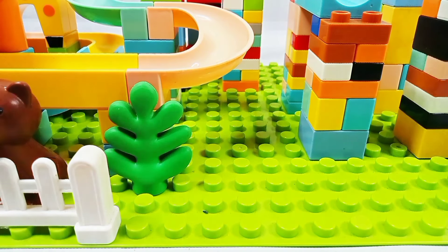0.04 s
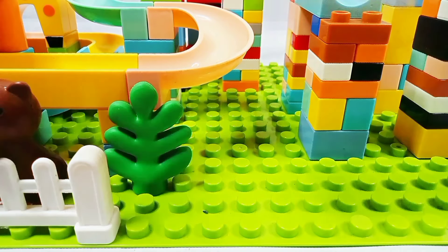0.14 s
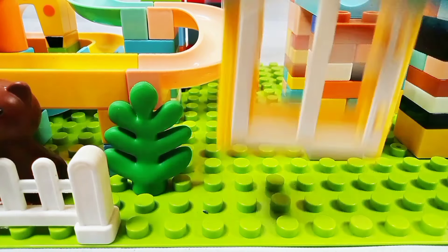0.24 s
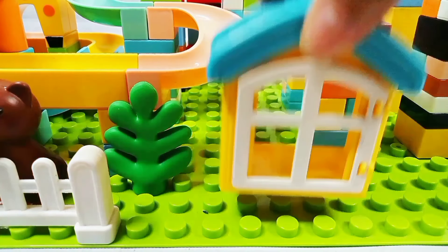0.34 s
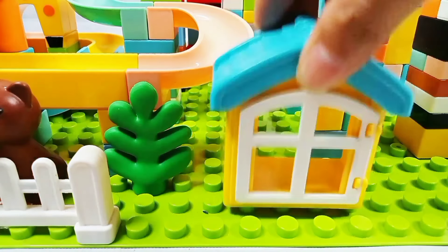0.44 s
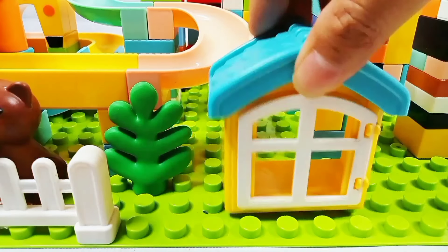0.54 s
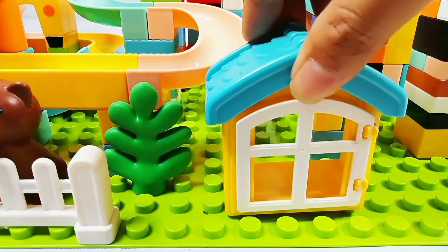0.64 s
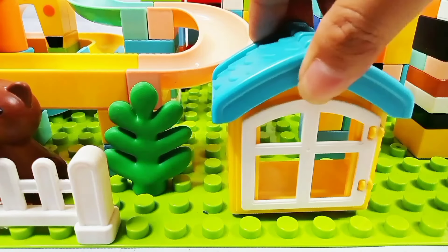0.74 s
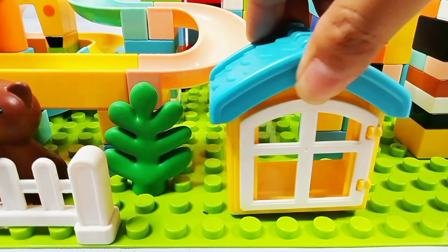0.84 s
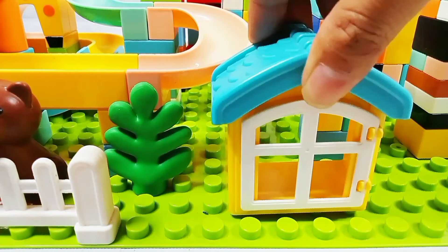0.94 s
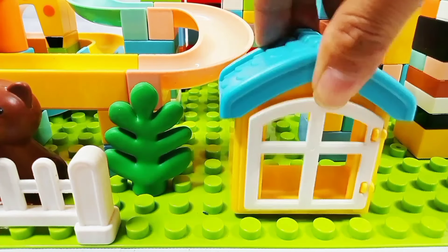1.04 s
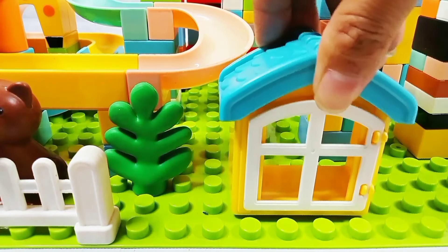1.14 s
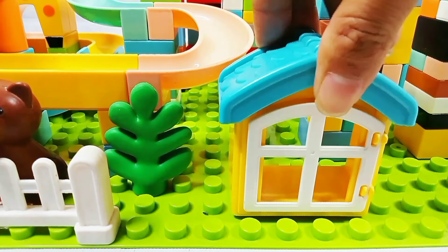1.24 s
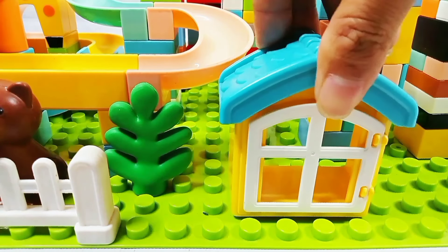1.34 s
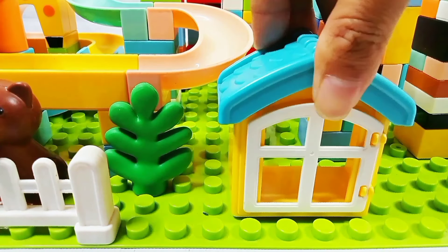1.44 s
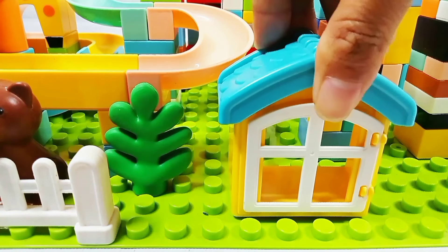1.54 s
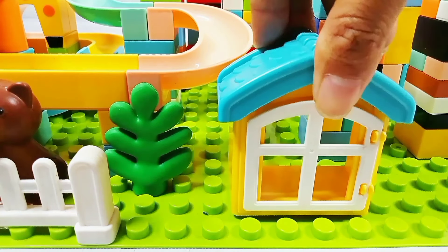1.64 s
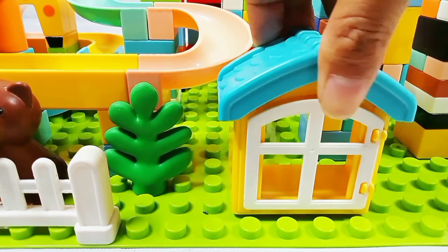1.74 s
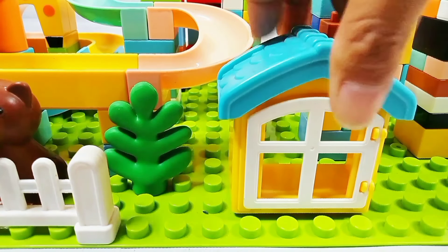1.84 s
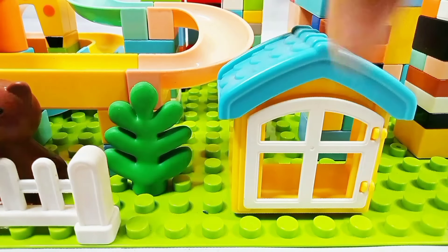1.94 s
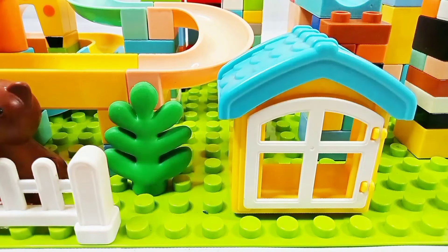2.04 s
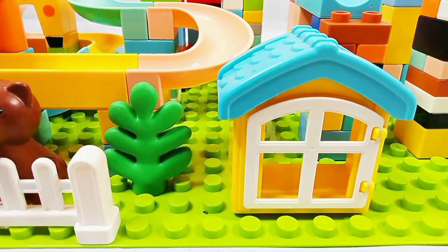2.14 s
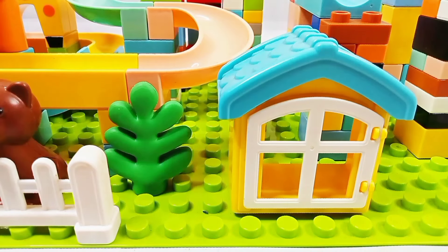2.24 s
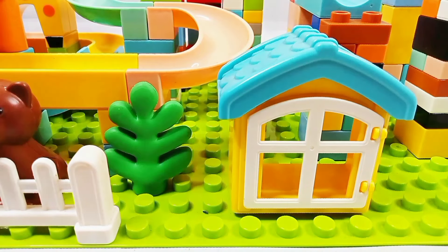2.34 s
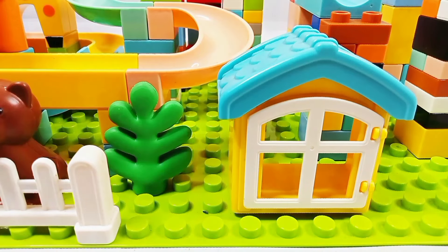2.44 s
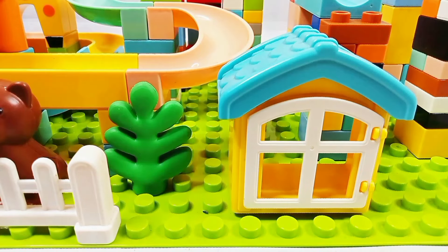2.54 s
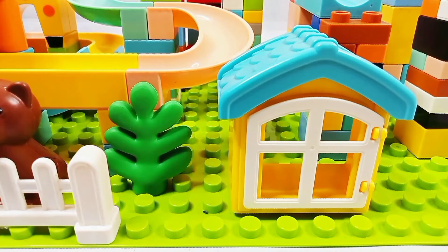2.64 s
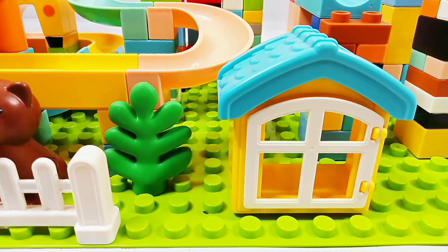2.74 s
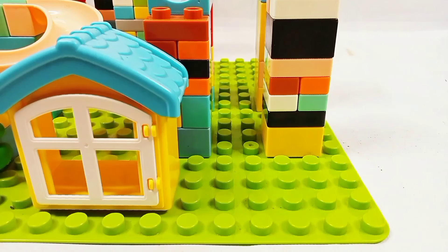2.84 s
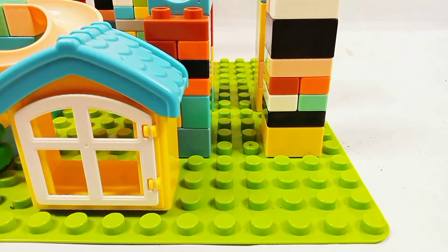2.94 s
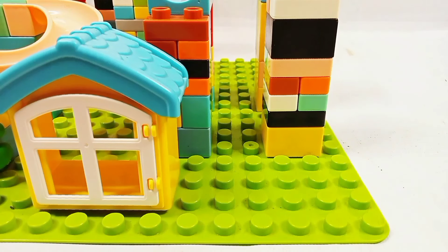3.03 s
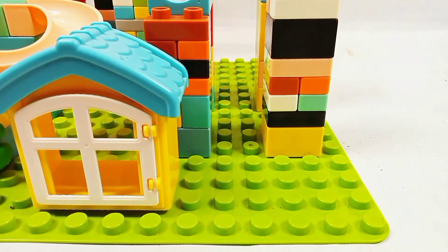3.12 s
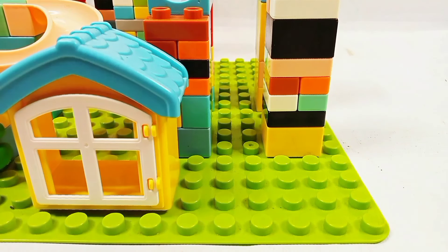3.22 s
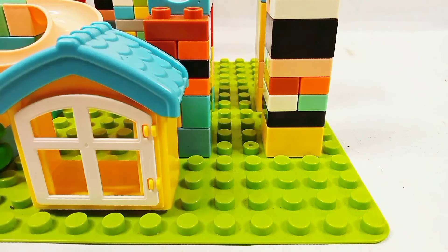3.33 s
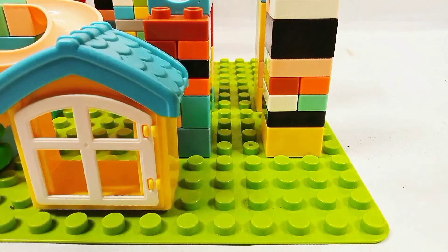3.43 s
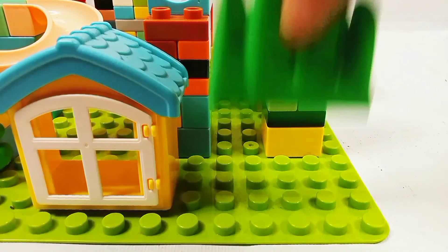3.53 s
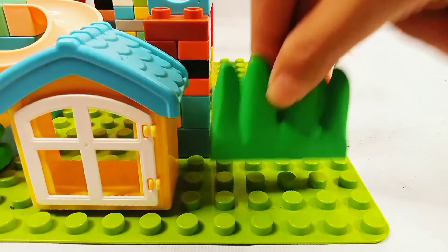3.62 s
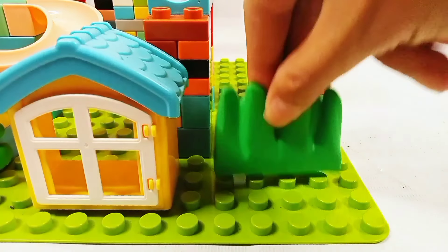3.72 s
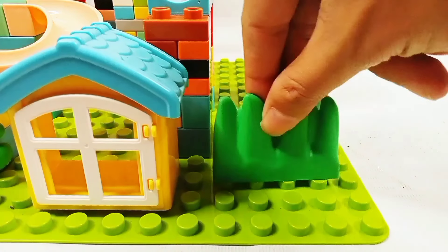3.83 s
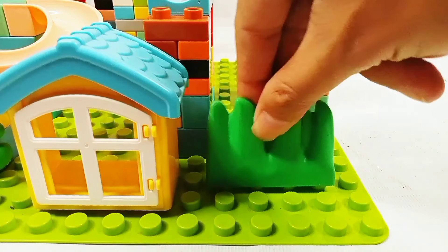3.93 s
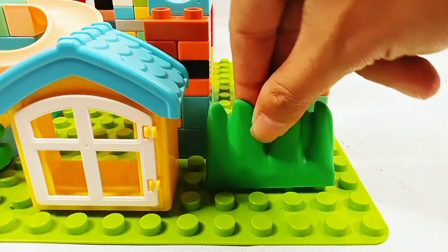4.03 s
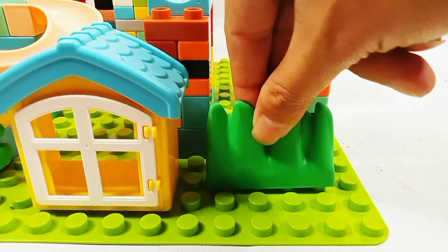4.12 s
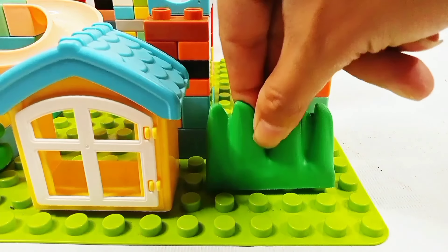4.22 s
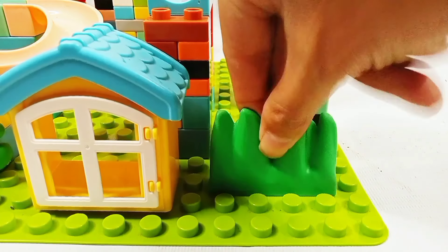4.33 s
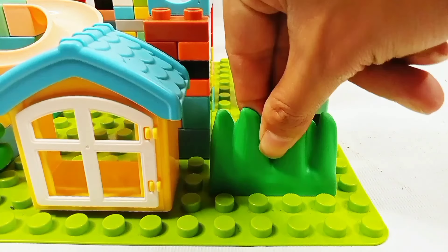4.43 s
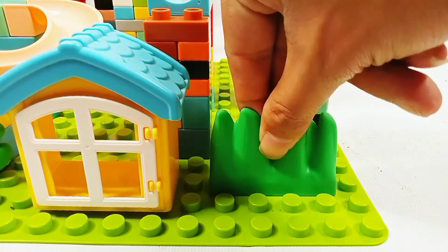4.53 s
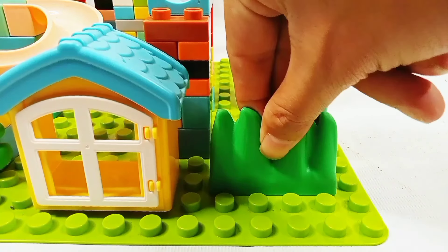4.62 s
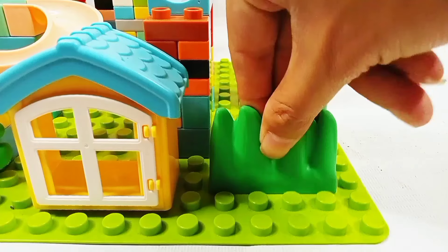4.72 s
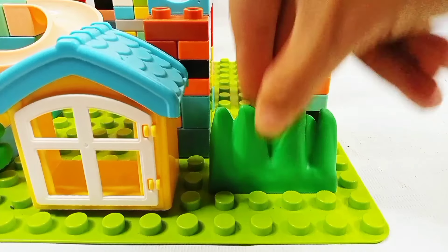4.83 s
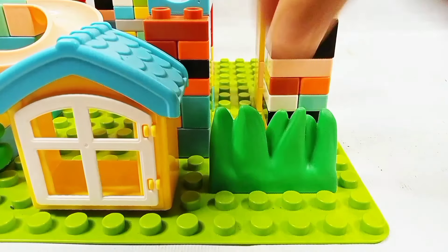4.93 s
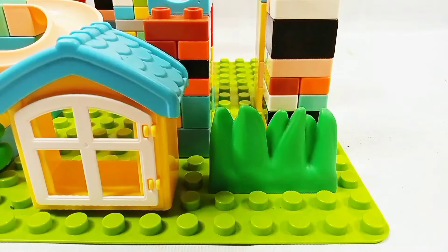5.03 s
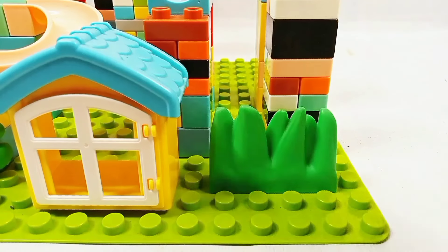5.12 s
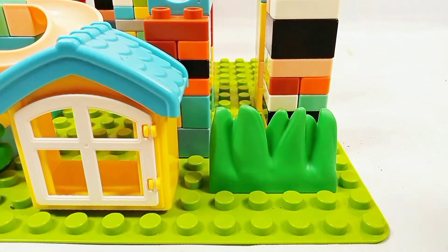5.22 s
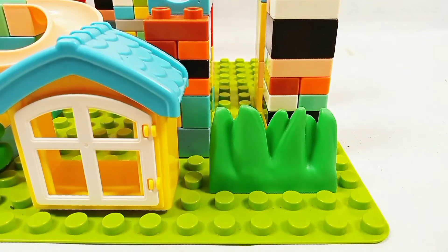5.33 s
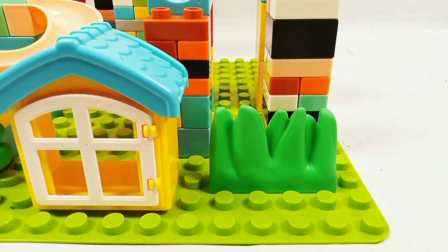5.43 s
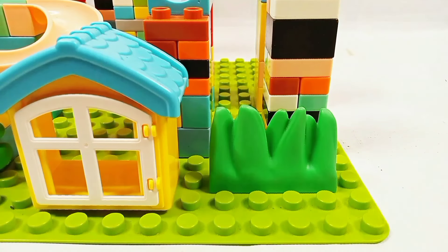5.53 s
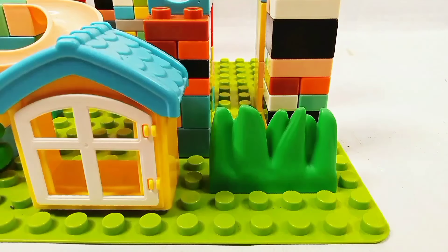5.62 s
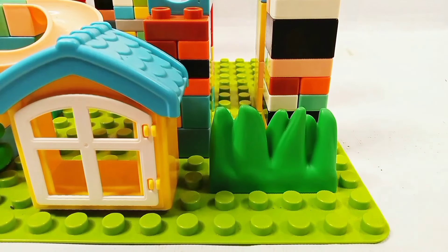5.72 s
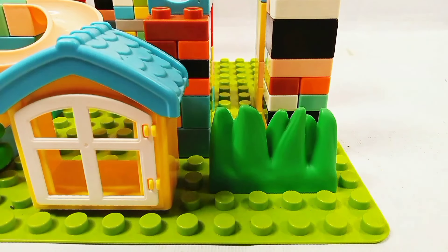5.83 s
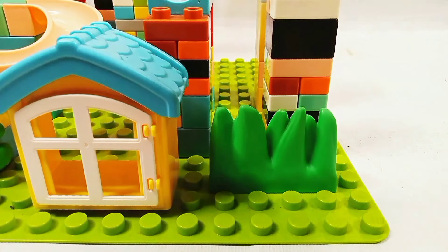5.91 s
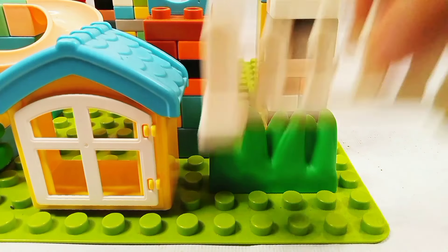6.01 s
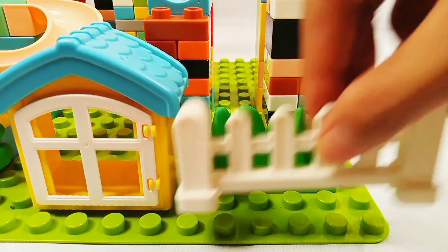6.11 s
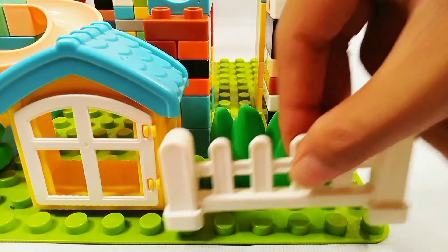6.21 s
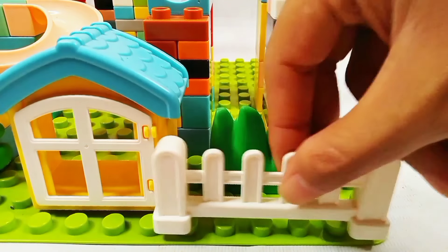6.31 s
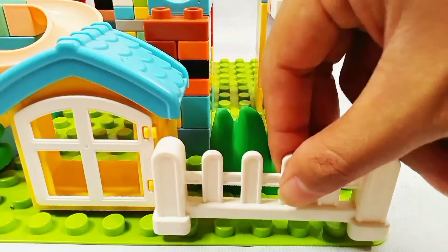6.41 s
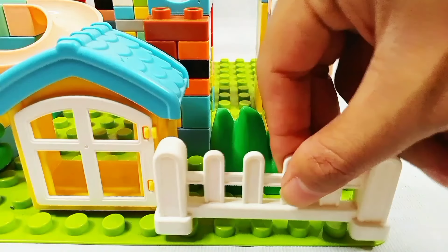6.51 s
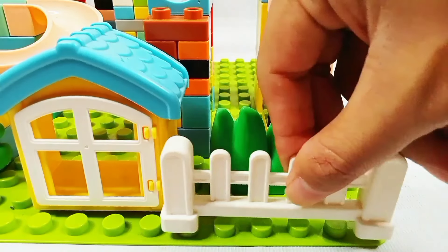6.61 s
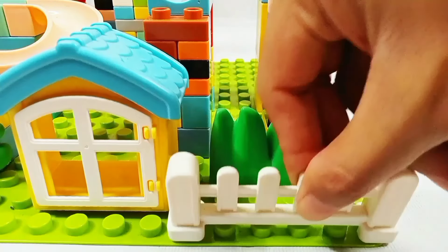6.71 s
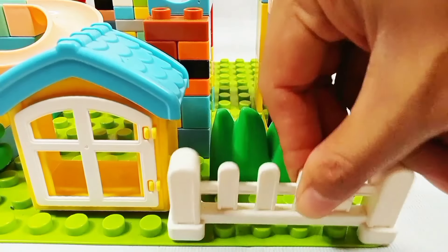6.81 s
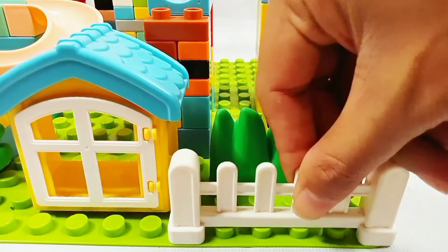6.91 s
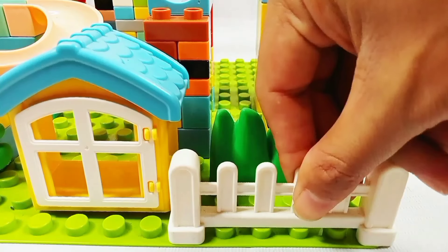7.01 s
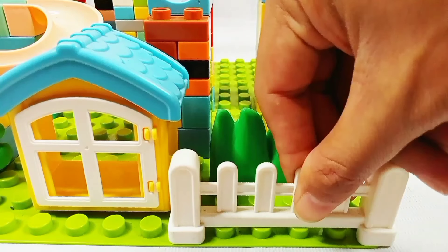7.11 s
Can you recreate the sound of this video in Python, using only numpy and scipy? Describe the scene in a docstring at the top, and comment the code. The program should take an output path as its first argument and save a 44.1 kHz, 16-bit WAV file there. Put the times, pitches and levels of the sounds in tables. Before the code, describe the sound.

A close microphone in a small, quiet room picks up hollow hard plastic pieces being pressed onto a studded baseplate. Near silence at first, with only a very faint buzz and noise floor. At about 0.6 s light knocks begin, with a sharp burst of cracks at 0.87 s, more taps around 1.0 s, and a bright, scraping double snap at 1.2 s. Small faint ticks trail off until about 2 s. Quiet until 3.9 s, when a tighter, drier piece snaps at 3.93 and 4.04 s, with small taps, soft low finger rumble and a heavy snap with a thump at 4.45 s. Rumble eases by 5 s. Quiet again until 6.4 s: a brief squeak and crack at 6.46 s, faint scraping, then a loud, deep seating clack at 6.84 s and light taps near 7 s. The hardest snaps distort slightly.

```python
"""Hollow plastic knocks and scrapes over studs, then snaps home in quick clusters of cracks, three times over:
a toy house, a tuft of grass and a fence go onto a studded baseplate. Knocks and cracks are noise bursts and
struck modes, scrapes are dense clicks through the same modes, squeaks and thumps are short dying tones.
The baseplate and a small room ring on as dying noise, over faint hiss, soft rumble, a buzz and a noise floor.
The close microphone overloads on the snaps."""
import sys
import numpy as np
from scipy import signal
from scipy.fft import rfft, irfft
from scipy.io import wavfile
from scipy.ndimage import uniform_filter1d

SR = 44100
rng = np.random.default_rng(int(sys.argv[2]) if len(sys.argv) > 2 else 0)


def store_pcm(level_fs):
    """Save levels as 16-bit WAV."""
    pcm = np.round(np.clip(level_fs, -1, 1) * 32767).astype(np.int16)
    wavfile.write(sys.argv[1], SR, np.atleast_2d(pcm).T)


N = 315756

# Spells of faint hiss: [from t/s, to t/s, level/dB]
HISS_SPELLS = [(0.597, 1.749, -59), (1.896, 2.042, -58.5), (2.783, 2.804, -61.5), (3.922, 4.988, -61.5),
               (6.409, 7.208, -60)]
# Colour of the hiss: [f/Hz, relative level/dB per Hz]
HISS_COLOUR = [(24, -30.5), (40, -1), (49, -14), (136, -13), (777, -16.5), (858, -18), (1100, -15.5),
               (8300, -17.5), (15500, -17.5)]
# Colour of the steady noise floor: [f/Hz, relative level/dB per Hz]
FLOOR_COLOUR = [(40, -1), (200, -14), (700, -16.5), (2000, -17.5), (6000, -30), (15500, -38.5)]
FLOOR_DB = -84
# Very faint buzz that fills the quiet, as steady sines: [f/Hz, peak level/dB]
BUZZ = [(129.2, -88.5), (172.3, -90), (258.4, -93), (387.6, -86.5), (473.7, -90.5), (516.8, -92),
        (689.1, -96.5), (775.2, -94), (818.3, -99)]
# Fingers press the grass down: [t/s of the hardest push, level/dB]
PRESSES = [(4.21, -64.5), (4.33, -71), (4.599, -61.5), (4.9, -63)]
PRESS_SWELL_S = 0.1   # each push swells and eases over about this time
# Colour of the rumble under the fingers: [f/Hz, relative level/dB per Hz]
RUMBLE_COLOUR = [(60, -14.5), (130, -13), (240, -1), (400, -13), (800, -28.5), (3000, -47.5)]

# Echoes of the small room: [f/Hz, relative level/dB per Hz, t60/s]
ROOM_TAIL = [(150, -11, 0.3), (500, -13, 0.26), (1030, -9.5, .28), (2240, -13, 0.18), (3700, -15.5, .24),
             (9900, -16, 0.062)]
# Crowded modes of the baseplate: [f/Hz, relative level/dB per Hz, t60/s]
PLATE_MODES = [(298, -15, .28), (550, -7, 0.31), (858.5, -2, .26), (1202.7, -4, .3), (1450, -13.5, .22),
               (2400, -24.5, 0.16), (3130, -25, .18), (3500, -15, .18), (5000, -27.5, 0.095),
               (7350, -24, .19), (10000, -34, .15)]
CUTOFF_HZ = 15400   # nothing much is heard above this

# The plate flexes under the push and thumps the table: [t/s, level/dB, f/Hz]
THUMPS = [(.871, -46, 180), (4.31, -40, 86), (4.454, -26.5, 184.3), (4.515, -54.5, 101.7), (6.84, -24, 195)]
# The fence squeaks on a stud: [t/s, level/dB before the room, f/Hz]
SQUEAKS = [(6.4155, -26, 2210), (6.436, -26.5, 2250), (6.458, -16, 2275), (6.492, -22, 3520)]

# When each piece is in the hand: (from t/s, to t/s)
HOUSE_TURN, GRASS_TURN, FENCE_TURN = (0, 3), (3, 6), (6, 8)
# What each hollow piece rings with: [f/Hz, relative level/dB]
HOUSE_MODES = [(226, -13.5), (457, 3.5), (657, -4), (753, -5), (836, -3.5), (1093, -1.5), (1209, -8),
               (1308, -5), (1399, -3.5), (1517, -0.5), (1821, -3.5), (2172, -6.5), (2499, 2), (3006, -6.5),
               (3372, 1.5), (3586, 4), (3945, -3), (5354, -6.5), (5989, -4.5), (6532, -2.5), (6986, -2.5),
               (7728, -8), (8312, -5), (9041, 5)]
GRASS_MODES = [(404, -0.5), (474, -13), (679, -3), (836, 2.5), (948, 5.5), (1323, -2), (1592, 1),
               (1775, -2), (1958, -2.5), (2083, -5), (2234, -9), (2803, 0), (3297, -1), (4023, -7.5),
               (5568, -4), (6073, -5.5), (6532, -5), (7065, -10.5), (8082, -3), (8840, -2)]
FENCE_MODES = [(237, -8), (329, -5), (522, 1), (609, -11.5), (786, -1.5), (876, 2), (964, -4.5),
               (1060, -0.5), (1447, -5), (1561, -2), (1883, -6), (2019, -9.5), (2240, -9), (2725, 1),
               (3989, -4.5), (4315, -11.5), (6211, -1.5), (6774, -7), (7205, -13.5), (8476, 3)]
# Edges of the five bands that give a contact its tone: [f/Hz]
BAND_EDGES_HZ = [170, 500, 1200, 2500, 5000, 10000]
# Tone of each piece: [relative level/dB], one for each band from low to high
HOUSE_TONE = [-2, 4.5, -1.16, -0.55, 1]
GRASS_TONE = [-7, 2.5, 5, -0.94, -0.4]
FENCE_TONE = [0.33, -0.84, 1, -0.47, -2]

# Rims sliding over studs: [start t/s, length/s, level/dB before the room, brightness/dB per octave]
SLIDES = [(.943, 0.04, -44.5, 8), (1.195, 0.01, -15, 1.5), (1.222, 0.012, -25.5, 3),
          (1.234, 0.0072, -23, -2), (1.472, 0.03, -60.5, 0), (1.535, 0.011, -55, -1),
          (1.665, 0.011, -55.5, 2.5), (3.926, .006, -29.5, 0.7), (4.44, 0.023, -41, -4.4),
          (6.416, 0.02, -37, -6), (6.478, 0.043, -38, -1), (6.695, .06, -49.5, 0.6),
          (6.81, 0.017, -38, -2.8), (7.004, 0.061, -43.5, -1.3)]
# Knocks on the studs while a piece is lined up: [t/s, level/dB before the piece's own gain, pitch f/Hz,
# focus/dB lost per octave away from the pitch, brightness/dB per octave]
TAPS = [(0.6165, -14.5, 950, 11.0, 0.8), (0.627, -22, 900, 3, -3.0), (0.686, -39, 8600.0, 3.0, -0.7),
        (0.727, -17.5, 630.0, 12.0, 7.5), (0.732, -18.0, 700, 10.5, 5.5), (0.783, -25, 550, 2.0, -2),
        (0.893, -22.0, 740, 1.5, 0.2), (1.008, -21.5, 890, 7.0, -3.5), (1.0305, -23.5, 880, 4.0, -0.9),
        (1.082, -43.0, 684, -0.5, -2.5), (1.227, -20.0, 5950.0, 0.5, 1.16), (1.247, -23.5, 3530, 3, 0.2),
        (1.309, -51, 744, -1, -1.5), (1.457, -43, 3460, 17.5, -8.5), (1.477, -41.0, 3480, 11, -1.5),
        (1.538, -40.5, 680, 9, 4.9), (1.595, -48, 2000.0, 11.5, 0.5), (1.666, -41.5, 5900, 20.5, -11.5),
        (1.955, -48.5, 6650, 4.0, 3), (4.0615, -23, 660.0, 1.5, -0.1), (4.1285, -28.0, 880, 11.5, -2.7),
        (4.346, -47.5, 1010.0, -2, 1.5), (4.464, -17, 1534, -1.5, 0.4), (6.416, -30.5, 2250.0, 13, -7),
        (6.4355, -19, 1614, 6, -3), (6.444, -22.0, 410.0, 12, 8), (6.492, -20.5, 3560, 6, -4.5),
        (6.505, -26, 3400, 3.5, -1.5), (6.807, -29.5, 404, 0.0, -0.6), (6.828, -23.5, 763, -1, -1.1),
        (7.009, -26.5, 853, 17.5, 2), (7.055, -31.5, 665, 9.5, 3)]
TAP_PLATE_DB = -23.5   # plate ringing relative to the strongest band of a tap
# Pieces snapping over the studs: [t/s, length/s, level/dB before the piece's own gain, pitch f/Hz,
# focus/dB lost per octave, brightness/dB per octave, plate ringing/dB relative to the strongest band]
SNAPS = [(.8675, 0.016, -7.5, 819.7, 2, 1.84, -23), (1.1905, 0.012, -8, 860.4, 1.5, 3.5, -30),
         (1.231, .002, -11, 7890, 3.5, 0.8, -24), (3.9325, 0.0086, -7.5, 2822, 1.5, 1.45, -10.5),
         (4.037, 0.0063, -6, 1741, 5, -1, -32.5), (4.0477, 0.01, -8, 2134, 2.5, -1.96, -31.5),
         (4.4525, 0.0029, -6, 1660, 0.5, -1, -7.5), (6.4572, 0.0036, -6.5, 2164, 2.5, 2.5, -18),
         (6.838, 0.0059, -3, 550, 5.5, 4, -17)]
CRACK_GAP_S, GAP_GROWTH = .0035, 1.2   # first gap between cracks; each gap is longer by this factor
SNAP_FADE_DB, CRACK_DULLING_DB = 10.5, 1.08   # lost at a snap's length; brightness/octave lost per crack


def from_db(db):
    """Decibels to gain."""
    return 10 ** (np.asarray(db) / 20)


def unit(x):
    """Scale to an energy of one."""
    return x / np.sqrt(np.sum(x ** 2) + 1e-20)


def at_hz(points, hz):
    """Read a spectrum on a log-frequency axis."""
    points = np.array(points)
    return np.interp(np.log(hz), np.log(points[:, 0]), points[:, 1])


def filtered(x, hz, kind, order=2):
    """Causal Butterworth filter."""
    sections = signal.butter(order, np.clip(hz, 10, .45 * SR), kind, fs=SR, output="sos")
    return signal.sosfilt(sections, x + 1e-18)


def dying(t, t60):
    """Envelope that falls 60 dB in t60."""
    return np.exp(-np.log(1000) * t / t60)


def add(out, s, sound):
    """Mix a sound in at a time in seconds."""
    at = int(s * SR)
    out[at:at + len(sound)] += sound[:N - at]


def during(rows, turn):
    """The events that fall in one piece's turn."""
    return [row for row in rows if turn[0] <= row[0] < turn[1]]


def noise(colour):
    """Steady noise of a given colour, rms one."""
    hz = np.maximum(np.fft.rfftfreq(N, 1 / SR), 1)
    spectrum = rfft(rng.standard_normal(N)) * from_db(at_hz(colour, hz))
    return unit(irfft(spectrum, N)) * np.sqrt(N)


def background():
    """Spells of hiss and swells of finger rumble over a steady buzz and noise floor."""
    t = np.arange(N) / SR
    spells = sum(from_db(db) * ((t > start) & (t < end)) for start, end, db in HISS_SPELLS)
    hiss = uniform_filter1d(spells, size=400) * noise(HISS_COLOUR)   # edges softened over 9 ms
    pushes = sum(from_db(db) * np.exp(-((t - s) / PRESS_SWELL_S) ** 2) for s, db in PRESSES)
    rumble = pushes * noise(RUMBLE_COLOUR)
    buzz = sum(from_db(db) * np.sin(2 * np.pi * (hz * t + rng.random())) for hz, db in BUZZ)
    return hiss + rumble + buzz + from_db(FLOOR_DB) * noise(FLOOR_COLOUR)


def diffuse(table, start_s=.005, build_s=0.0088):
    """Crowded modes or echoes: noise that builds up, then dies band by band."""
    t = np.arange(SR * 3 // 4) / SR
    edges = np.geomspace(60, 16000, 25)
    build = np.clip((t - start_s) / build_s, 0, 1)
    table, out = np.array(table), 0
    for low, high in zip(edges, edges[1:]):
        hz = np.sqrt(low * high)
        band = filtered(rng.standard_normal(len(t)), [low, high], "band")
        tail = band * build * dying(t, at_hz(table[:, ::2], hz))   # columns f and t60
        width = np.sqrt(2 * (high - low) / SR)   # level per Hz to level of the band
        out = out + from_db(at_hz(table, hz)) * width * unit(tail)
    return out


def room(x, tail_db):
    """The direct sound with the diffuse echoes of the small room behind it."""
    return x + from_db(tail_db) * signal.fftconvolve(x, diffuse(ROOM_TAIL))[:N]


def microphone(x, knee_hz=9600, above_db=-15):
    """The close microphone's response steps down above the knee and keeps falling."""
    below = filtered(x, knee_hz, "low", order=10)
    above = filtered(filtered(x, knee_hz, "high", order=10), 12000, "low")
    return below + from_db(above_db) * above


def pings(rows, t60):
    """Thumps and squeaks: each a single mode that starts at once and dies away."""
    out, t = np.zeros(N), np.arange(SR // 4) / SR
    for s, db, hz in rows:
        add(out, s, from_db(db) * np.sin(2 * np.pi * hz * t) * dying(t, t60))
    return out


def ringing(modes, ring_t60, damping=0.074, spread_db=3.5, detune=.012):
    """The modes of a hollow piece after one blow; the grip shifts their strength and pitch each time."""
    t = np.arange(SR // 5) / SR
    hz, mode_db = np.transpose(modes)[:, :, None]
    hz = hz * (1 + detune * rng.standard_normal(hz.shape))
    strength = from_db(mode_db + spread_db * rng.standard_normal(hz.shape))
    strength = strength * rng.choice([-1, 1], hz.shape)
    t60 = ring_t60 * (hz / np.median(hz)) ** -damping   # plastic damps high modes sooner
    return np.sum(strength * np.sin(2 * np.pi * hz * t) * dying(t, t60), axis=0)


def slides(rows, modes, slips_per_s=2600, ring_t60=.016, uneven_db=4.0, lowest_hz=260):
    """A rim sticks and slips over the studs: dense tiny clicks into the modes, damped by the fingers."""
    out = np.zeros(N)
    for s, length, db, bright_db in rows:
        n = int(length * SR)
        slips = (rng.random(n) < slips_per_s / SR) * rng.choice([-1, 1], n)
        slips = slips * from_db(uneven_db * rng.standard_normal(n))
        tilted = [(hz, mode_db + bright_db * np.log2(hz)) for hz, mode_db in modes]
        rub = signal.fftconvolve(slips * signal.windows.tukey(n, .5), ringing(tilted, ring_t60))
        rub = filtered(rub, lowest_hz, "high")   # small shells give off no bass
        add(out, s, from_db(db) * np.sqrt(n) * unit(rub))
    return out


def band_levels(tone, db, pitch_hz, focus_db, bright_db):
    """A piece's tone gathers around the pitch of the touched wall; a hard edge tilts it upwards."""
    edges = np.log2(np.array(BAND_EDGES_HZ) / pitch_hz)
    octaves = (edges[:-1] + edges[1:]) / 2   # band centres, counted from the pitch
    shape = np.array(tone) + bright_db * octaves - focus_db * np.abs(octaves)
    return db + 20 * np.log10(unit(from_db(shape)))


def touches(turn, tone, count=4):
    """A tap is one contact; a snap is a run of cracks that slow down, fade and dull."""
    rows = []
    for s, db, hz, *edge in during(TAPS, turn):
        rows.append((s, hz, *band_levels(tone, db, hz, *edge), TAP_PLATE_DB))
    for s, length, db, hz, focus_db, bright_db, plate_db in during(SNAPS, turn):
        late = 0
        for k in range(count):
            fade_db = min(SNAP_FADE_DB * (late / length) ** 2, 60)
            dulled_db = bright_db - k * CRACK_DULLING_DB
            bands = band_levels(tone, db - fade_db, hz, focus_db, dulled_db)
            rows.append((s + late, hz, *bands, plate_db))
            late += CRACK_GAP_S * GAP_GROWTH ** k   # the studs give way one after another
    return rows


def wall(x, hz, lift_db=2.5, sharpness=6):
    """The wall that is touched favours the modes near its own pitch."""
    return x + from_db(lift_db) * signal.lfilter(*signal.iirpeak(hz, sharpness, fs=SR), x)


def coloured(x, band_db, air_db, bass_db=-25):
    """Causal equaliser that steers each band of a short sound to its energy."""
    spectrum, hz = rfft(x), np.maximum(np.fft.rfftfreq(len(x), 1 / SR), 1)
    curve = []
    for db, low, high in zip(band_db, BAND_EDGES_HZ, BAND_EDGES_HZ[1:]):
        energy = 2 * np.sum(np.abs(spectrum[(hz >= low) & (hz < high)]) ** 2) / len(x)
        gain_db = db - 10 * np.log10(energy)
        curve += [(low * 1.15, gain_db), (high / 1.15, gain_db)]
    curve = [(70, curve[0][1] + bass_db)] + curve + [(11000, curve[-1][1] + air_db)]
    cepstrum = irfft(np.log(from_db(at_hz(curve, hz))), len(x))
    cepstrum[1:] *= 2 * (np.arange(1, len(x)) < len(x) / 2)   # minimum phase: nothing sounds early
    return irfft(spectrum * np.exp(rfft(cepstrum)), len(x))


def contacts(rows, modes, ring_t60, crack_t60, crack_db, rise_s, level_db, air_db, grain_db=4.5):
    """Each touch rings the piece's modes, cracks in a burst of tiny slips and sets the plate ringing."""
    out, t = np.zeros(N), np.arange(SR // 5) / SR
    blow = from_db(level_db) * np.sqrt(SR / 200)   # levels count over five milliseconds
    seating = 1 - np.exp(-t / rise_s)   # the force builds as the rim rides over a stud
    plate = unit(diffuse(PLATE_MODES))
    for s, pitch_hz, *band_db, plate_db in rows:
        grains = np.repeat(rng.standard_normal(len(t)), 24)[:len(t)]   # a new strength every 24 samples
        crack = rng.standard_normal(len(t)) * from_db(grain_db * grains) * dying(t, crack_t60)
        ring = unit(ringing(modes, ring_t60) * seating)
        hit = ring + from_db(crack_db) * unit(crack * seating)
        add(out, s, blow * coloured(wall(hit, pitch_hz), band_db, air_db))
        add(out, s, blow * from_db(max(band_db) + plate_db) * plate)
    return out


def scene():
    """Three pieces go onto the plate in turn, close to the microphone in a small room."""
    house = contacts(touches(HOUSE_TURN, HOUSE_TONE), HOUSE_MODES, ring_t60=0.04, crack_t60=0.029,
                     crack_db=0.5, rise_s=0.00021, level_db=0.5, air_db=-2.5)
    grass = contacts(touches(GRASS_TURN, GRASS_TONE), GRASS_MODES, ring_t60=0.022, crack_t60=0.014,
                     crack_db=2.5, rise_s=0.00031, level_db=-0.5, air_db=1)
    fence = contacts(touches(FENCE_TURN, FENCE_TONE), FENCE_MODES, ring_t60=0.025, crack_t60=0.039,
                     crack_db=3.0, rise_s=0.00046, level_db=-1.65, air_db=-1.5)
    house = house + slides(during(SLIDES, HOUSE_TURN), HOUSE_MODES)
    grass = grass + slides(during(SLIDES, GRASS_TURN), GRASS_MODES)
    fence = fence + slides(during(SLIDES, FENCE_TURN), FENCE_MODES) + pings(SQUEAKS, t60=0.046)
    toys = room(house, tail_db=-1.5) + room(grass, tail_db=-7.5) + room(fence, tail_db=-7.0)
    toys = toys + pings(THUMPS, t60=0.036)   # the thumps stay dry
    return (microphone(toys) + background())[None]


def record(dry, top=1.0, offset=-0.0013):
    """The input clips at its top level, the highest treble is cut and the signal sits slightly off zero."""
    clipped = np.clip(dry, -top, top)
    low_pass = signal.ellip(10, .1, 70, CUTOFF_HZ, fs=SR, output="sos")
    return signal.sosfilt(low_pass, clipped) + offset


dry = scene()
out = record(dry)
store_pcm(out)
```